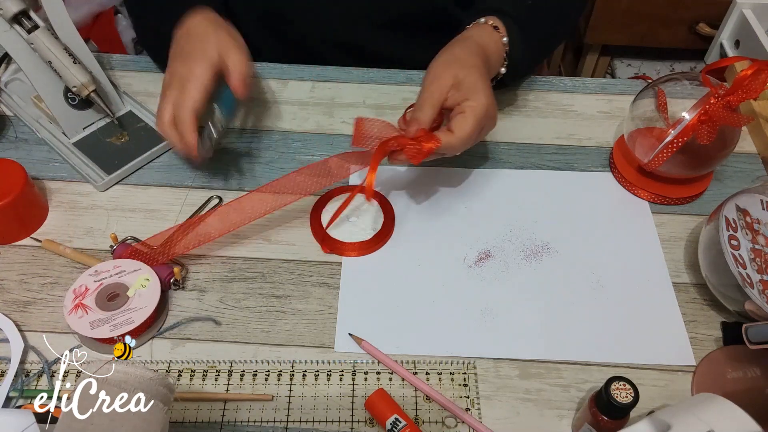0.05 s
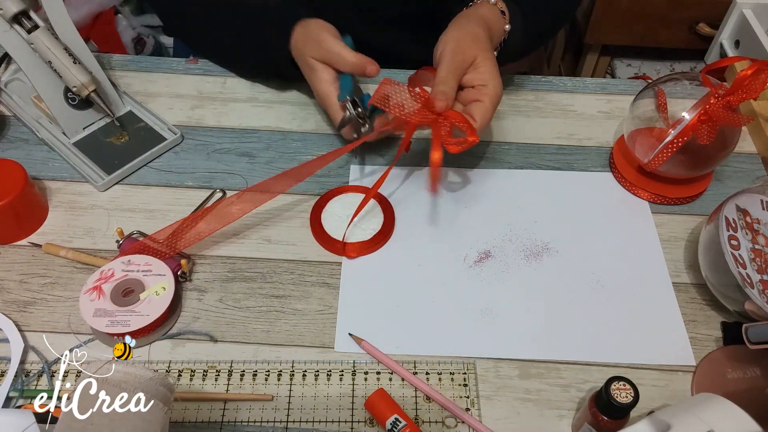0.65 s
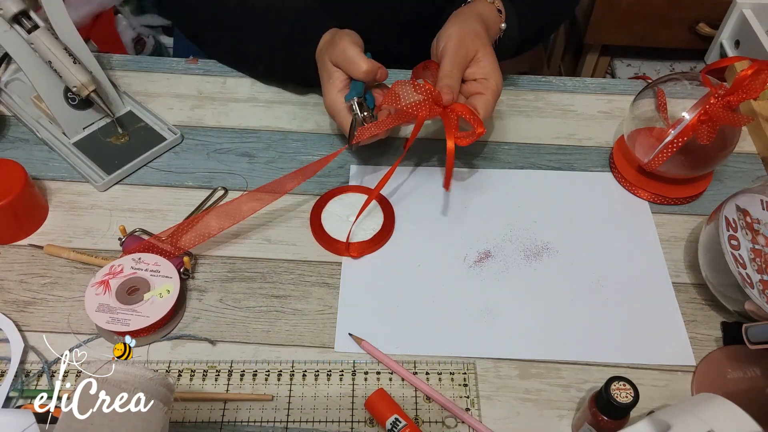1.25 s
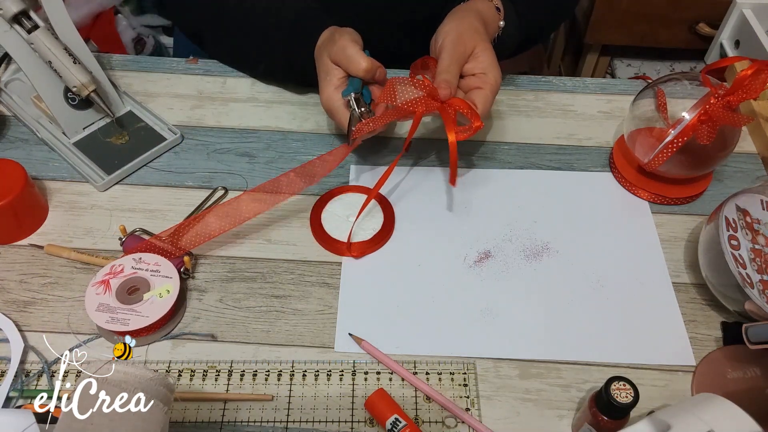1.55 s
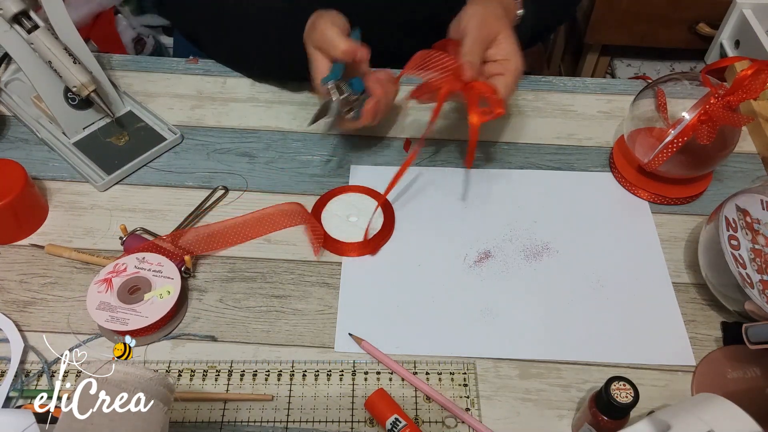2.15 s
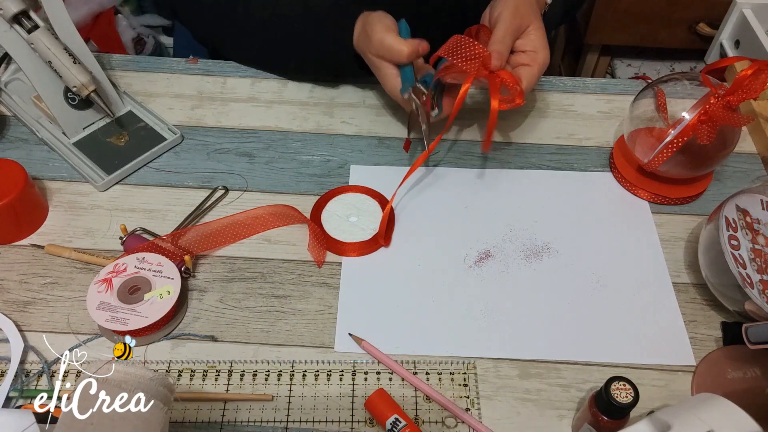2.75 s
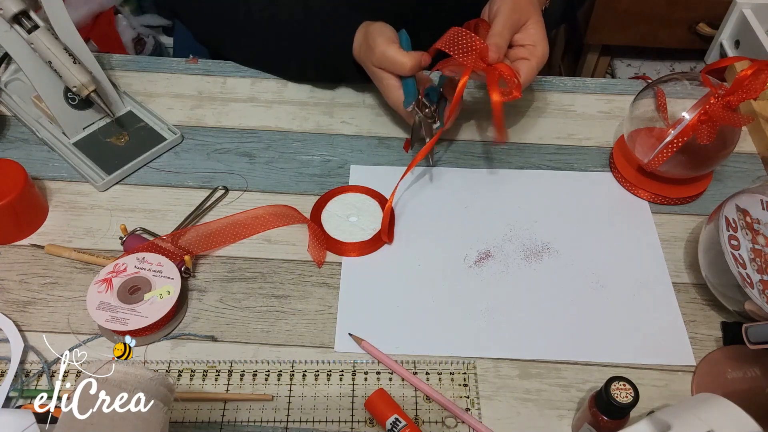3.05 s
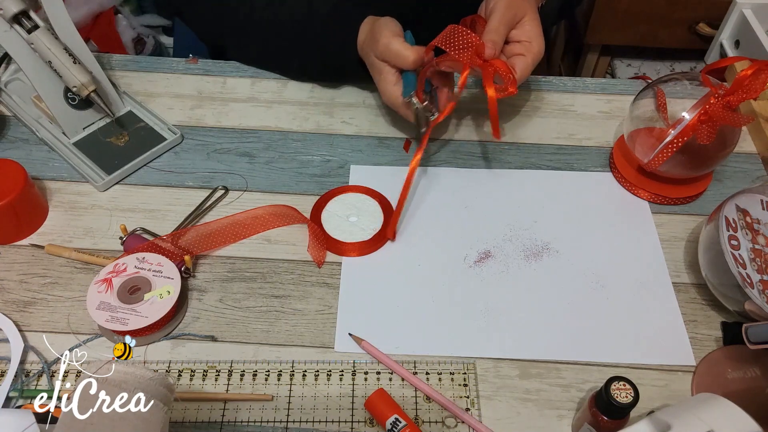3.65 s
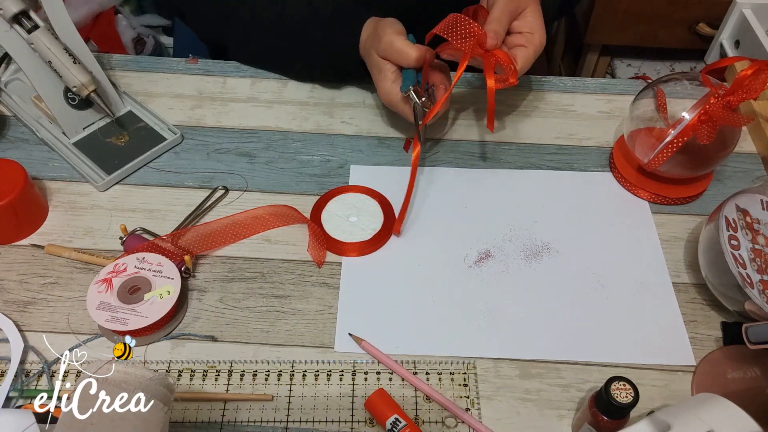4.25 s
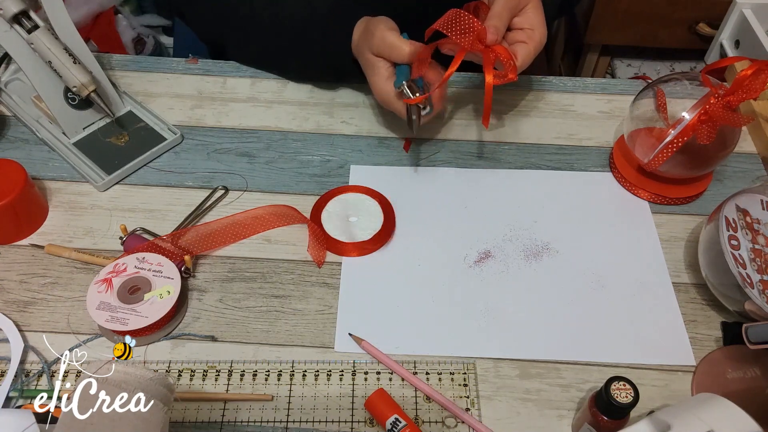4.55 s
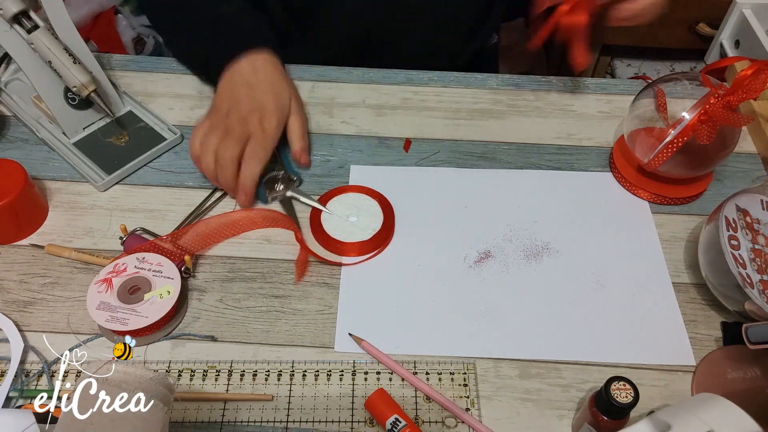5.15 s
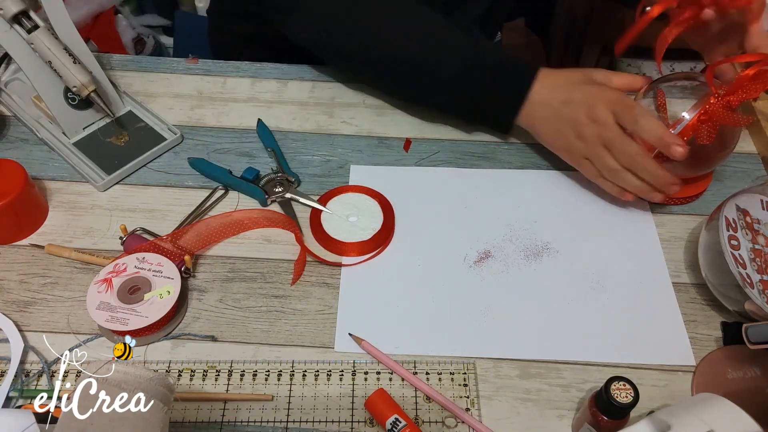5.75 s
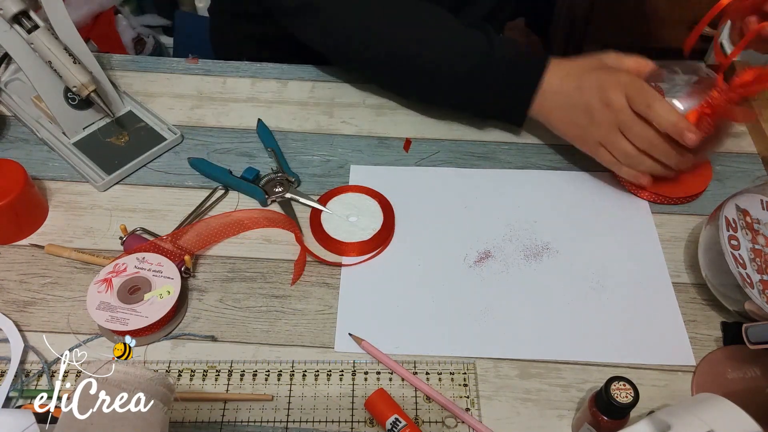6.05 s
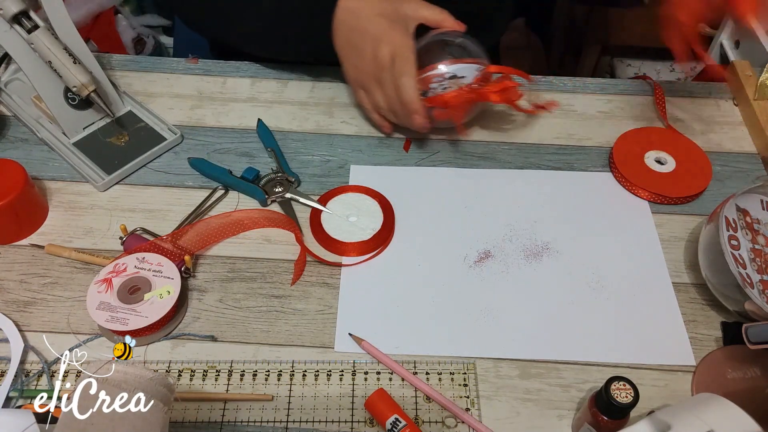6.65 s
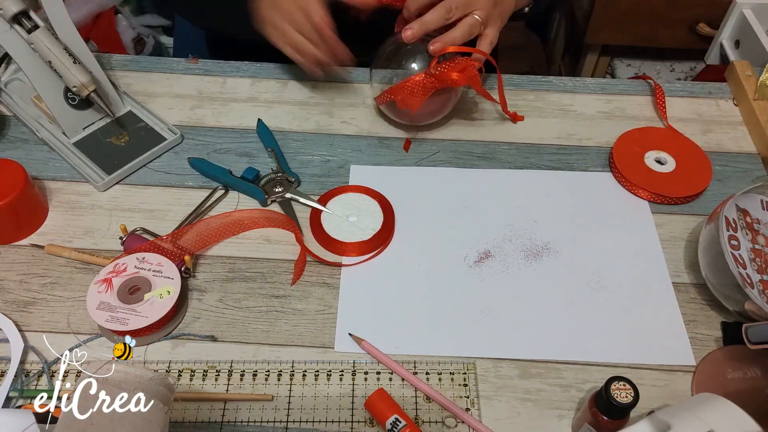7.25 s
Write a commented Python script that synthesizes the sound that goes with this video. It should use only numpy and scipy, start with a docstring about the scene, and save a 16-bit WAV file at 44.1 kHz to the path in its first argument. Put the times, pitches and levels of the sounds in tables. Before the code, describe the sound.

Quiet, close scissor snips through ribbon, a loud rattling drop of the scissors on a table, and a dull knock from a plastic ball.

```python
"""A soft bump and a rustle of ribbon come first, as scissors are lifted off a craft table in a small room.
They trim a bow: the blades rub shut, threads part, the joint snaps. Dropped, they bounce and rattle
on the table top; then a hollow plastic ball is picked up, its shell ticking, and set down with a knock.
The recorder stands close by, and each of its two microphone ports has a treble resonance of its own."""
import sys
import numpy as np
from scipy import signal
from scipy.fft import rfft, irfft, next_fast_len
from scipy.io import wavfile
from scipy.ndimage import map_coordinates

SR = 44100
rng = np.random.default_rng(int(sys.argv[2]) if len(sys.argv) > 2 else 0)


def bounce(signal):
    """Save signal as a 16-bit WAV file at the path given by the first command-line argument."""
    frames = np.transpose(np.atleast_2d(signal))
    limited = np.clip(frames, -1, 1)
    pcm = np.round(limited * 32767).astype(np.int16)
    wavfile.write(sys.argv[1], SR, pcm)


N = 325899
TIME = np.arange(N) / SR
CONTACT_T60_S, CUTOFF_HZ = .007, 16200


def from_db(db):
    """Decibels to gain."""
    return 10 ** (np.asarray(db) / 20)


def unit_power(x):
    """Scale to an RMS of 1."""
    return x / np.sqrt(np.mean(x ** 2) + 1e-20)


def cut(x, hz, kind, order=2):
    """Causal low- or high-pass."""
    return signal.sosfilt(signal.butter(order, min(hz, .45 * SR), kind, fs=SR, output="sos"), x + 1e-18)


def bell(x, hz, width_hz, db):
    """A causal resonant boost or dip."""
    w, height = 2 * np.pi * min(hz, .45 * SR) / SR, from_db(db / 2)
    damping = np.tan(np.pi * min(width_hz, SR / 4) / SR)
    return signal.lfilter([1 + damping * height, -2 * np.cos(w), 1 - damping * height],
                          [1 + damping / height, -2 * np.cos(w), 1 - damping / height], x)


def coloured(x, spectrum):
    """Shape a steady signal by rows of (f/Hz, level/dB); unit power."""
    hz, db = np.transpose(spectrum)
    size = next_fast_len(N)
    bins = np.maximum(np.fft.rfftfreq(size, 1 / SR), 1)
    gain = from_db(np.interp(np.log(bins), np.log(hz), db))
    return unit_power(irfft(rfft(x, size) * gain, size)[..., :N])


def add(track, t, sound):
    """Mix a short sound in at t seconds."""
    start = max(round(t * SR), 0)
    track[..., start:start + sound.shape[-1]] += sound[..., :N - start]


def ring(modes, vary_db=1.5, travel_s=0, lag_cycles=0.41):
    """Struck modes, each reaching each port with a strength and lag of its own."""
    hz, db, t60 = np.transpose(modes)[:, :, None]
    # bending waves bring the high modes first; the travel time is given at 1 kHz
    arrival = travel_s * np.sqrt(1000 / hz)
    lag = lag_cycles * rng.random((2, *hz.shape)) / hz
    age = np.maximum(TIME[:SR // 4] - arrival - lag, 0)
    strength = from_db(db + vary_db * rng.standard_normal((2, *hz.shape)))
    sign = (-1) ** np.arange(len(hz))[:, None]
    waves = sign * strength * from_db(-60 * age / t60) * np.sin(2 * np.pi * hz * age)
    return np.sum(waves, axis=1) / np.linalg.norm(from_db(db)) / 2


def crack(t60, low_hz, high_hz):
    """A burst of micro-contacts, a little different at each port; height about 1."""
    age = TIME[:SR // 20]
    shared, left, right = rng.standard_normal((3, len(age)))
    burst = (shared + .42 * np.array([left, right])) * from_db(-60 * age / t60)
    burst = cut(cut(burst, low_hz, "high"), high_hz, "low", order=4)
    return burst / np.sqrt(np.sum(burst ** 2) / (0.023 * t60 * SR))


def friction(per_s, spread_db, clump_db):
    """Tiny slips of uneven size that come in clumps; unit power."""
    clumps = unit_power(cut(rng.standard_normal(N), 40.7, "low"))
    slips = (rng.random(N) < per_s / SR) * rng.choice([-1, 1], N)
    sizes = from_db(spread_db * np.minimum(rng.exponential(1, N), 4) + clump_db * clumps)
    return unit_power(slips * sizes)


def excite(slips, response):
    """Every slip sets off the same short stereo response; unit power."""
    return unit_power(signal.fftconvolve(np.atleast_2d(slips), response, axes=1)[:, :N])


def strokes(rows, attack_s, build_db, release_t60):
    """Gain of strokes (t/s, length/s, level/dB): each sets in, swells or eases to its level, dies away."""
    gain, age = np.zeros(N), TIME[:SR]
    for start, length, db in rows:
        onset = np.clip(age / attack_s, 0, 1)
        build = build_db * (np.minimum(age / length, 1) - 1)
        release = -60 * np.maximum(age - length, 0) / release_t60
        add(gain, start, onset * from_db(db + build + release))
    return gain


# faint rustle of fingers that never quite rest: t/s, level/dB
FINGER_RUSTLE = [(0.0, -53.5), (0.2, -70), (0.97, -69.5), (1.29, -64.5), (1.5, -88), (1.89, -68.5),
                 (2.18, -68), (2.8, -76), (3.9, -85), (4.79, -70), (5.14, -67), (6.63, -71.5), (6.96, -77),
                 (7.39, -64.5)]
# ribbon drawn through the fingers or brushing past: t/s, length/s, level/dB
RIBBON_STROKES = [(0.0, 0.2, -61.5), (.362, 0.086, -62.5), (.53, 0.2, -60.5), (1.11, 0.15, -69),
                  (1.472, 0.029, -59), (1.652, 0.021, -63.5), (1.952, 0.036, -55.5), (2.15, 0.18, -64),
                  (2.562, 0.013, -59.5), (2.88, 0.083, -67.5), (3.435, 0.091, -61.5), (3.745, 0.081, -59.5),
                  (4.07, 0.097, -64), (4.157, 0.112, -58), (4.503, 0.0039, -49), (4.785, 0.084, -60.5),
                  (4.918, 0.057, -57.5), (6.035, 0.042, -61.5), (6.47, 0.086, -62), (7.17, 0.16, -61)]
# spectrum of the ribbon at close range: f/Hz, level/dB
RIBBON_SPECTRUM = [(200, -15), (600, -11.5), (2500, -8.5), (4000, -4.5), (8500, -2), (10500, -7),
                   (15500, -6)]
# crisp ticks of ribbon, plastic and the scissors' tips: t/s, level/dB
CRISP_TICKS = [(0.0478, -30), (0.369, -40), (0.5206, -43), (1.07, -36), (1.126, -38), (1.184, -43),
               (1.514, -46), (2.1604, -42), (2.356, -41), (2.377, -39), (2.607, -44), (2.733, -41.5),
               (3.717, -43.5), (3.762, -38.5), (4.199, -35), (4.239, -35), (5.195, -22), (5.2471, -16),
               (6.0581, -34.5)]


def ribbon():
    """Threads catch and slip under the fingers; the stiff mesh crinkles, with a few sharper ticks."""
    shared, left, right = [friction(per_s=5000, spread_db=3.8, clump_db=2.6) for _ in range(3)]
    threads = unit_power(shared + 2.0 * np.array([left, right]))
    bucklings = friction(per_s=60, spread_db=2.5, clump_db=1.5)
    crinkles = excite(bucklings, crack(t60=0.014, low_hz=3000, high_hz=13900))
    fidget = from_db(1 + np.interp(TIME, *np.transpose(FINGER_RUSTLE), left=-120, right=-120))
    stroking = strokes(RIBBON_STROKES, attack_s=0.0058, build_db=2, release_t60=0.08)
    out = np.hypot(fidget, stroking) * coloured(threads + from_db(-4.5) * crinkles, RIBBON_SPECTRUM)
    for t, db in CRISP_TICKS:
        add(out, t, from_db(db) * crack(t60=0.019, low_hz=3925, high_hz=15000))
    return out


# modes of the table top: f/Hz, level/dB, t60/s
TABLE_MODES = [(82, -24.5, 0.22), (129.5, -14.5, 0.18), (165, -14.5, 0.064), (240, -7.5, 0.06),
               (361.8, -6.5, 0.055), (470, 0.5, 0.034), (571.5, -8.5, 0.04), (674.3, -2, 0.05),
               (755, -4.5, 0.059), (836, -2, 0.03), (993, -2, 0.035), (1198, 3.5, 0.015),
               (1406, 5.5, 0.016), (1540, 1.5, 0.013), (1800, 5, 0.011), (2130, 1, 0.0052)]
# damped modes of the scissors' frame, also rung by the snips: f/Hz, level/dB, t60/s
FRAME_MODES = [(1560, -2, 0.012), (2200, 2, 0.009), (2560, 5, 0.014), (2850, 3, .014), (3700, 1, 0.008)]
# the scissors bump the table when lifted, and later land and bounce:
# t/s, thud level/dB, high-pass f/Hz, low-pass f/Hz, crack level/dB
TABLE_KNOCKS = [(.008, -21, 192, 252, -84), (0.046, -25.5, 600, 830, -44), (5.2028, 1.5, 152, 2300, -7.5),
                (5.2155, -19.5, 496, 2300, -41), (5.2481, -4.5, 115, 1840, -13.5),
                (5.2495, -3.5, 200, 1350, -8), (5.2604, -11, 204, 2050, -32),
                (5.2867, -12.5, 298, 1724, -24)]


def scissors_on_table():
    """Steel cracks and rings at the contact; the table top follows, duller for a softer touch."""
    out = np.zeros((2, N))
    for t, thud_db, lowest_hz, soft_hz, crack_db in TABLE_KNOCKS:
        thud = cut(ring(TABLE_MODES, travel_s=0.001, lag_cycles=0.3), soft_hz, "low", order=4)
        add(out, t, from_db(thud_db) * cut(thud + rattle(thud), lowest_hz, "high"))
        steely = bell(crack(CONTACT_T60_S, low_hz=1530, high_hz=11000), hz=4300, width_hz=1900, db=8.5)
        add(out, t, from_db(crack_db) * (steely + rattle(steely)))
        add(out, t, from_db(crack_db - 8.5) * ring(FRAME_MODES))
    return out * from_db([[1.7], [-1.7]])  # a little left of the recorder


def rattle(blow, per_s=600, t60=.07, db=-14):
    """The loose joint and spring chatter: dying repeats of a blow, too light to move the bass."""
    age = TIME[:blow.shape[-1]]
    touches = (rng.random(blow.shape) < per_s / SR) * rng.standard_normal(blow.shape)
    touches *= from_db(-60 * age / t60) * (age > CONTACT_T60_S)
    touches /= np.linalg.norm(touches, axis=1, keepdims=True)
    return from_db(db) * cut(signal.fftconvolve(blow, touches, axes=1)[:, :len(age)], 450, "high")


# modes of the plastic handles: f/Hz, level/dB, t60/s
HANDLE_MODES = [(2020, -4, 0.023), (2450, -10.5, 0.025), (3270, -17, 0.014)]
# the handles meet as the scissors are lifted: t/s, level/dB
HANDLE_CLACKS = [(0.133, -49.5), (0.153, -43), (0.1679, -30.5), (0.189, -39.5)]


def handle_clacks():
    """Plastic knocks on plastic: a short ring with contact noise."""
    out = np.zeros((2, N))
    for t, db in HANDLE_CLACKS:
        add(out, t, from_db(db) * cut(ring(HANDLE_MODES), 1260, "high"))
        add(out, t, from_db(db - 1.5) * crack(t60=0.015, low_hz=1690, high_hz=11700))
    return out


# fibres crunch between the blades: t/s, length/s, level/dB
FIBRE_CUTS = [(.93, 0.041, -66), (1.11, 0.23, -65), (2.14, 0.15, -67.5)]
# the blades slide over each other: t/s, length/s, rasp level/dB, singing level/dB
BLADE_GLIDES = [(1.06, 0.24, -65.5, -77), (1.965, 0.052, -67, -87), (2.164, 0.024, -60.5, -78),
                (2.285, 0.018, -67, -66), (3.375, 0.128, -74, -65.5), (3.806, 0.14, -77, -66.5),
                (3.98, 0.1, -88, -80), (4.091, 0.053, -68.5, -66), (4.172, 0.088, -63.5, -57.5),
                (4.503, 0.022, -57, -59.5), (4.617, 0.054, -57, -72), (4.785, 0.02, -53.5, -81),
                (4.897, 0.034, -67, -77)]
# thin tones of the free blades: f/Hz, level/dB
BLADE_TONES = [(2615, 0), (2750, -4), (3050, -6), (3915, -7), (4350, -2), (4807, -4), (5090, -7),
               (5925, -6), (6130, -8), (7890, -5), (9040, -5)]
# a blade sticks and slips, and its tip squeaks: t/s, length/s, level/dB
TIP_SQUEAKS = [(2.282, .022, -64.5), (3.87, .1, -69), (4.18, .08, -70)]
# tones of a blade's tip, in squeaks and pings: f/Hz, level/dB
TIP_TONES = [(3128, -8), (5640, 0), (6635, -10), (7480, -9), (8260, -7), (9300, -7)]


def gliding_blades():
    """Steel on steel rasps, sings and squeaks; the ribbon's threads part one by one with a crackle."""
    shared, left, right = [friction(per_s=2500, spread_db=2.5, clump_db=4.5) for _ in range(3)]
    slips = shared + 1.25 * np.array([left, right])
    frame_band = unit_power(cut(cut(slips, 2690, "high", order=4), 2950, "low", order=6))
    treble_band = unit_power(cut(cut(slips, 5200, "high", order=4), 8200, "low"))
    rasp = frame_band + from_db(-3) * treble_band
    tones = sagging(excite(slips, steel_ring(BLADE_TONES)))
    squeak = excite(slips, steel_ring(TIP_TONES))
    partings = friction(per_s=170, spread_db=3, clump_db=2)
    fibres = excite(partings, crack(CONTACT_T60_S, low_hz=9200, high_hz=CUTOFF_HZ))
    # pressure builds as the blades close; the crunch eases as the cut runs out
    closing = dict(attack_s=0.014, build_db=0.5, release_t60=0.091)
    glides = np.array(BLADE_GLIDES)
    rasping = strokes(glides[:, [0, 1, 2]], **closing)
    singing = strokes(glides[:, [0, 1, 3]], **closing)
    squeaking = strokes(TIP_SQUEAKS, **closing)
    shearing = strokes(FIBRE_CUTS, attack_s=0.018, build_db=-8, release_t60=.04)
    return rasping * rasp + singing * tones + squeaking * squeak + shearing * fibres


def steel_ring(tones, t60_cycles=600):
    """Ring of free steel; the high tones die first."""
    return ring([(hz, db, t60_cycles / hz) for hz, db in tones])


def sagging(tones, share=.004):
    """The tones start sharp and end flat in each stroke as the contact travels along the blades."""
    ends = [t for start, length, *_ in BLADE_GLIDES for t in (start, start + length)]
    position = np.cumsum(np.interp(TIME, ends, [1 + share, 1 - share] * len(BLADE_GLIDES)))
    return np.array([map_coordinates(x, [position], mode="mirror") for x in tones])


# the joint and blades snap: t/s, level/dB, relative frame level/dB, crunch t60/s
JOINT_SNAPS = [(1.326, -45.5, 6.5, 0.018), (1.3629, -32, 4, 0.063), (1.7877, -33.5, 1.5, 0.014),
               (2.0112, -27, -3.5, 0.0084), (2.184, -41, -1, 0.024), (3.865, -42.5, 2, 0.052),
               (4.158, -39, -4, 0.0086), (4.263, -28.5, -4, 0.0052), (4.515, -43, 2, 0.038),
               (4.6448, -13.5, -9.5, 0.0082), (4.6545, -33.5, -7, 0.01), (4.79, -43.5, 1, 0.084)]


def snips(detune=.06):
    """Each snap crunches and rings the frame, whose tones shift with the grip and the opening."""
    out = np.zeros((2, N))
    for t, db, frame_db, crunch_t60 in JOINT_SNAPS:
        hard_db = 0.33 * max(db + 30, 0)  # a hard snap trades crunch for steel ring
        crunch = crack(crunch_t60, low_hz=4640, high_hz=13500)
        snap = bell(crunch, hz=5380, width_hz=4000, db=10 + hard_db)
        add(out, t, from_db(db - 4.5 - hard_db) * snap)
        frame = [(hz * (1 + detune * rng.uniform(-1, 1)), *rest) for hz, *rest in FRAME_MODES]
        add(out, t, from_db(db + frame_db) * cut(ring(frame, vary_db=3), 870, "high"))
    return out


# pings of a blade's tip: t/s, level/dB
TIP_PINGS = [(2.377, -48.5), (3.864, -49)]


def tip_pings():
    """The blades spring apart and a free tip rings."""
    out = np.zeros((2, N))
    for t, db in TIP_PINGS:
        add(out, t, from_db(db) * steel_ring(TIP_TONES))
    return out


# modes of the ball's plastic shell: f/Hz, level/dB, t60/s
SHELL_MODES = [(4100, -4, 0.024), (5390, -4, 0.024), (5735, 1, 0.026), (6150, -3, 0.028)]


def shell_tick():
    """The thin shell rings and crackles, differently at each spot touched."""
    out = ring(SHELL_MODES, vary_db=3.5)
    add(out, 0, from_db(-10.5) * crack(t60=0.064, low_hz=695, high_hz=8800))
    return out


# fingers and bow tap the ball as it is carried: t/s, level/dB
SHELL_TAPS = [(5.945, -50.5), (6.5132, -53), (7.1922, -45.5), (7.3144, -42)]
# modes of the hollow ball against the table: f/Hz, level/dB, t60/s
BALL_MODES = [(122, -2, .1), (160, 6, .105), (238, 6, .075), (270, 7, .08), (320, 6, .04), (385, 8, .055),
              (535, 5, .05), (690, 4, .045), (785, 4, .05), (1150, -1, .04)]
# the ball touches down and rocks: t/s, thud level/dB, low-pass f/Hz, shell level/dB
BALL_BUMPS = [(6.8619, -19.5, 1004, -25), (6.867, -29.5, 870, -31), (6.877, -22, 403, -68),
              (6.995, -42, 191, -59.5), (7.110, -33, 511, -49.5), (7.139, -36, 340, -50)]


def ball():
    """The hand damps the hollow ball, so it knocks drily on the table; fingers tap its shell."""
    out = np.zeros((2, N))
    for t, thud_db, soft_hz, shell_db in BALL_BUMPS:
        add(out, t, from_db(thud_db) * cut(ring(BALL_MODES, lag_cycles=0.42), soft_hz, "low", order=4))
        add(out, t, from_db(shell_db) * shell_tick())
    for t, db in SHELL_TAPS:
        add(out, t, from_db(db) * shell_tick())
    return out


# spectrum of the room tone: f/Hz, level/dB
ROOM_TONE = [(20, 7.5), (60, -9.5), (170, -11), (350, -15), (700, -22), (4000, -30.5), (16000, -56.5)]
# spectrum of the microphones' self-noise: f/Hz, level/dB
MIC_HISS = [(300, -1), (1500, 0.5), (3500, -1.5), (6000, -10.5), (10500, 3), (16000, -18)]


def background():
    """Under it all, low room tone partly shared by the ports, and each microphone's own hiss."""
    shared, left, right = rng.standard_normal((3, N))
    air = coloured(shared + 1.8 * np.array([left, right]), ROOM_TONE)
    return from_db(-64.5) * air + from_db(-77) * coloured(rng.standard_normal((2, N)), MIC_HISS)


def from_the_right(x, lag_s=.00005):
    """The hands work to the right of the recorder, so the left port hears them later."""
    return np.array([map_coordinates(x[0], [(TIME - lag_s) * SR]), x[1]])


def room(x, wet_db, bass_t60, treble_t60):
    """Near walls answer within milliseconds; treble dies first, bass is partly alike at both ports."""
    age = TIME[:SR // 2]
    noise = rng.standard_normal((3, len(age)))
    bass_db, treble_db = -60 * age / bass_t60, -60 * age / treble_t60
    bass = cut(noise[2] + .5 * noise[:2], 1100, "low") * from_db(bass_db - 12)
    treble = cut(noise[:2], 620, "high") * (from_db(treble_db) + from_db(bass_db - 20))
    echoes = (bass + treble) * np.clip(age / 0.0028 - .4, 0, 1)
    echoes /= np.sqrt(np.sum(echoes ** 2) / 2)
    return x + from_db(wet_db) * signal.fftconvolve(x, echoes, axes=1)[:, :N]


def scene():
    """Hands and craft table in the small room, heard from close by."""
    hands = ribbon() + gliding_blades() + snips() + tip_pings() + handle_clacks()
    handling = room(from_the_right(hands) + ball(), wet_db=-5, bass_t60=0.19, treble_t60=0.12)
    knocks = room(scissors_on_table(), wet_db=-6, bass_t60=0.29, treble_t60=0.12)
    return handling + knocks + background()


# peaks and dips of the microphone ports, left then right: f/Hz, width/Hz, level/dB
PORT_RESONANCES = [
    [(220, 650, 6.5), (4700, 5400, -4.5), (8620, 2100, 15.5), (13290, 8800, -15.5)],
    [(5904, 1900, 12.5), (10470, 2500, -15), (14870, 2000, 2)],
]


def record(dry):
    """Each microphone port colours its channel; the recorder cuts the top steeply."""
    channels = []
    for x, resonances in zip(dry, PORT_RESONANCES):
        for hz, width_hz, db in resonances:
            x = bell(x, hz, width_hz, db)
        channels.append(x)
    return signal.sosfilt(signal.ellip(10, .2, 70, CUTOFF_HZ, fs=SR, output="sos"), channels)


dry = scene()
out = record(dry)
bounce(out)
```